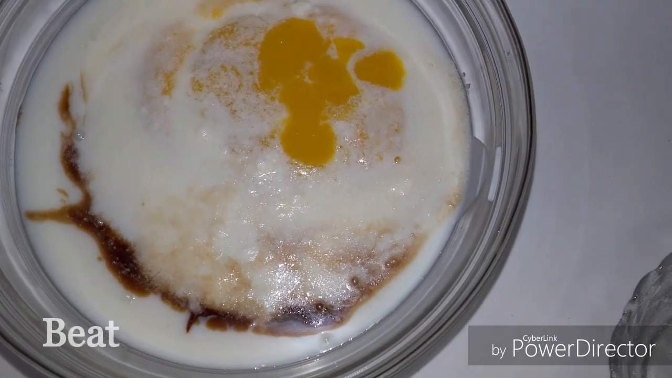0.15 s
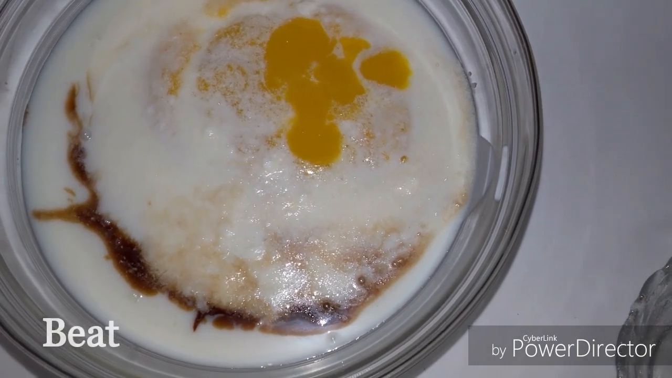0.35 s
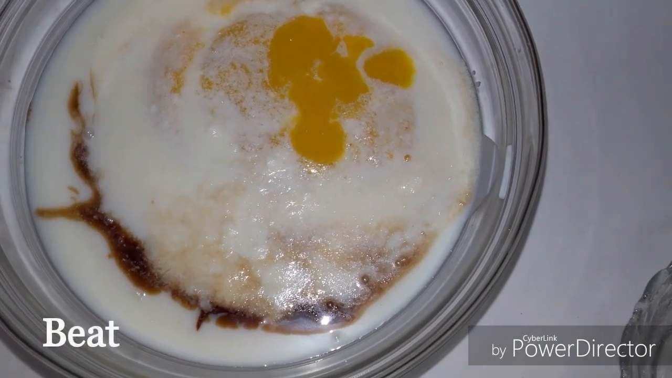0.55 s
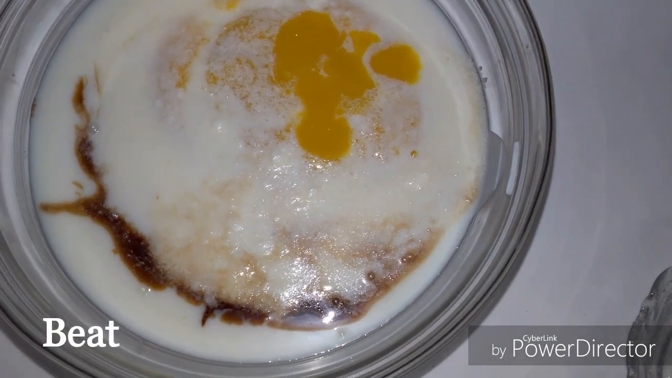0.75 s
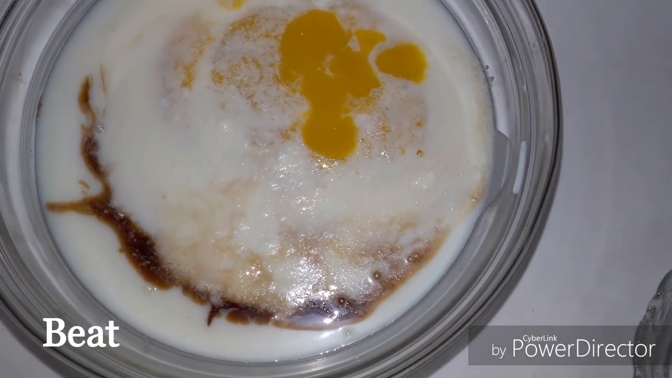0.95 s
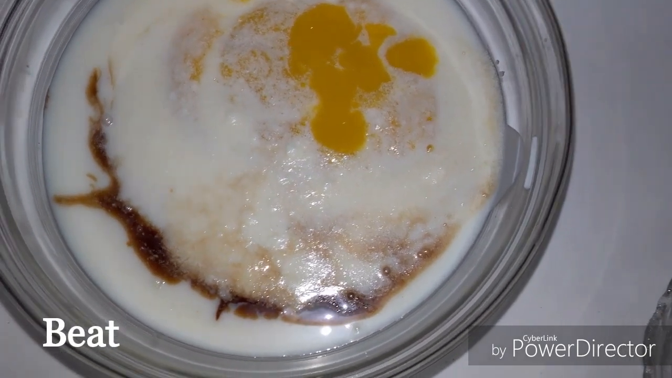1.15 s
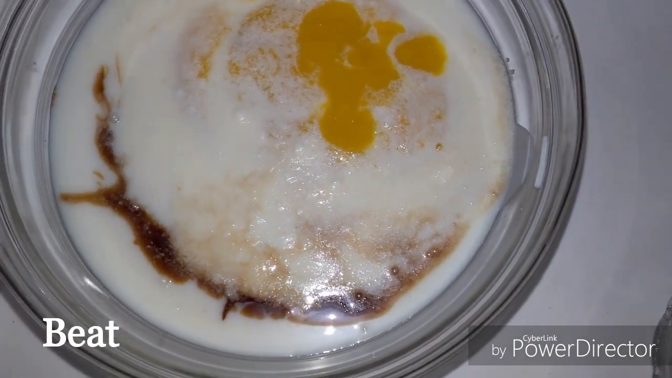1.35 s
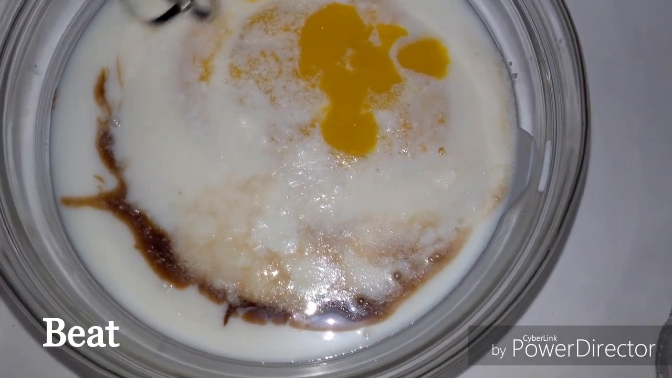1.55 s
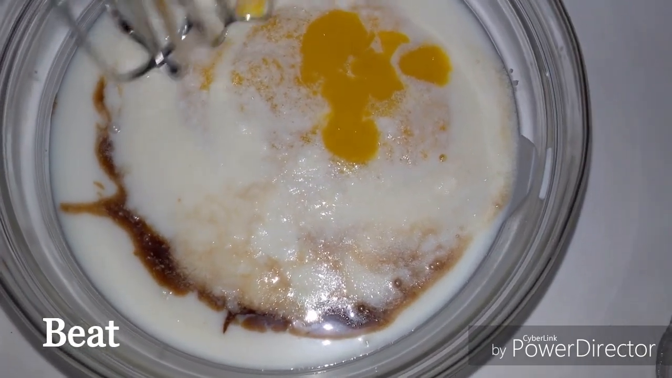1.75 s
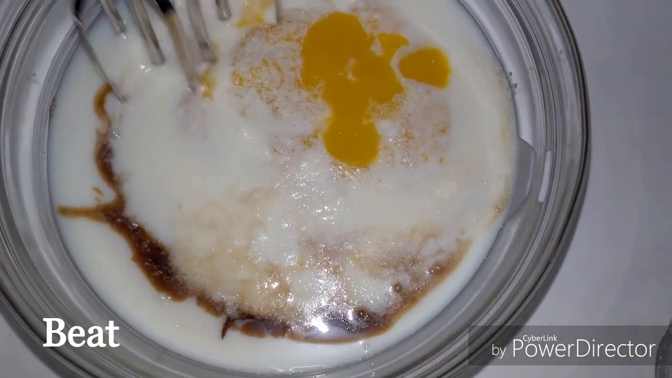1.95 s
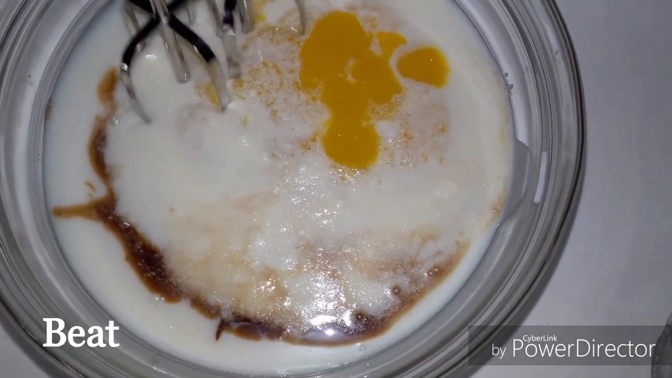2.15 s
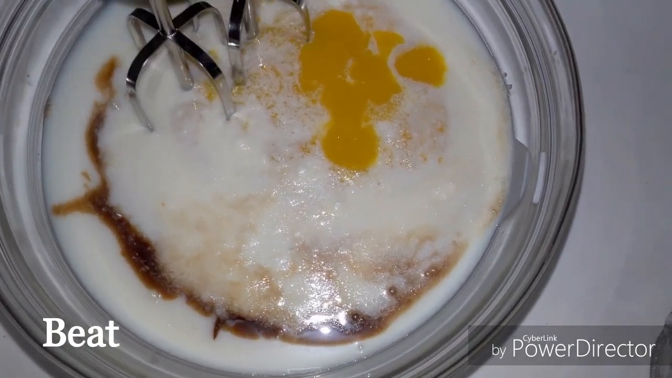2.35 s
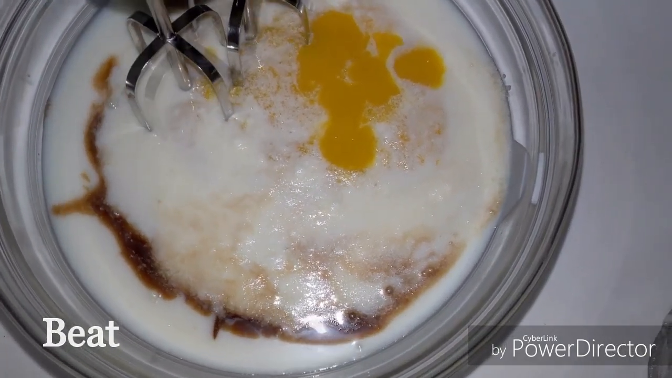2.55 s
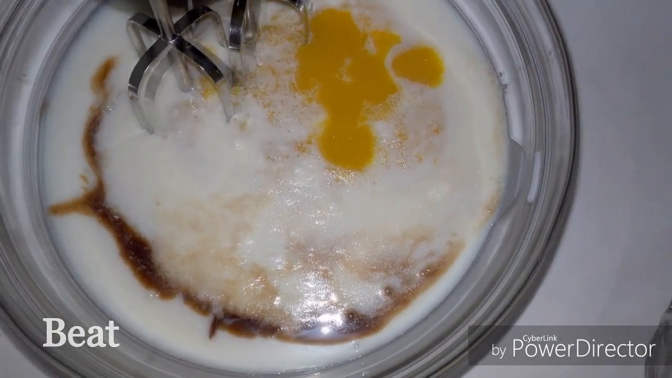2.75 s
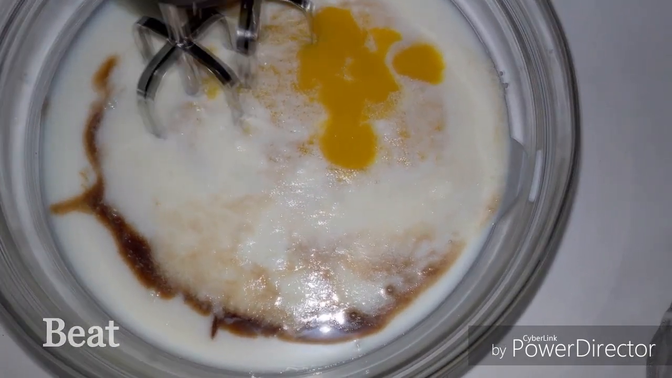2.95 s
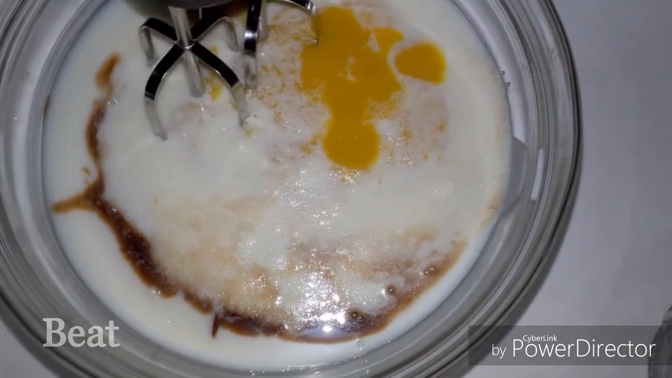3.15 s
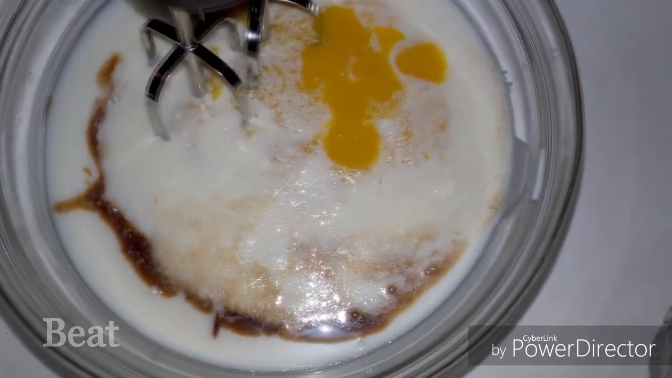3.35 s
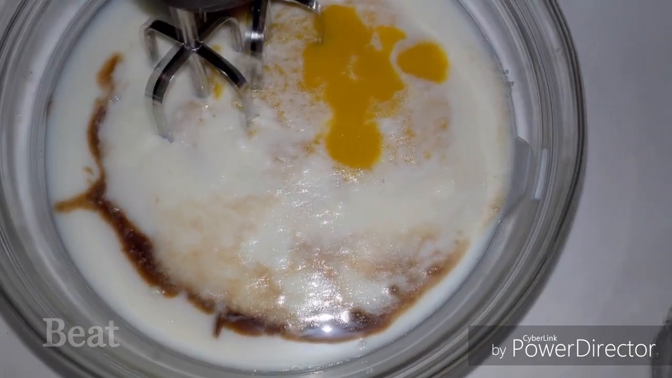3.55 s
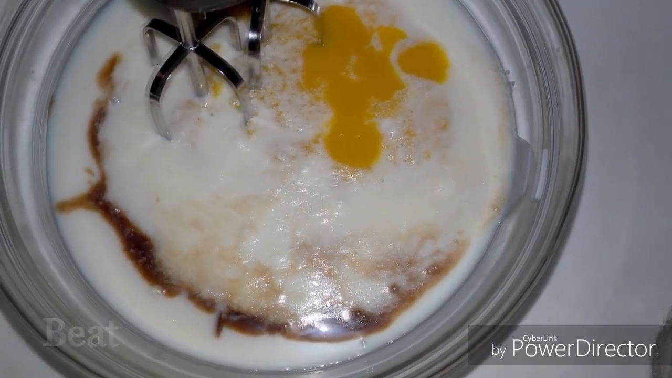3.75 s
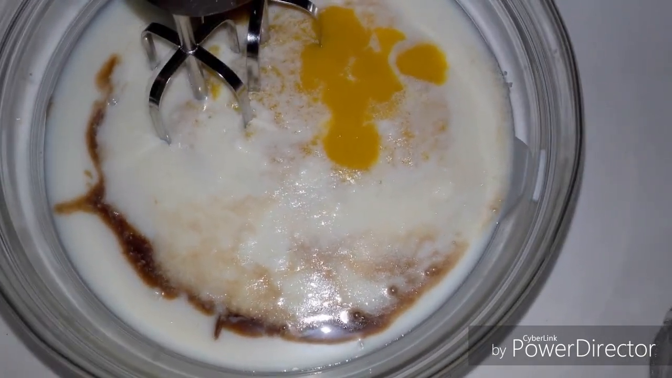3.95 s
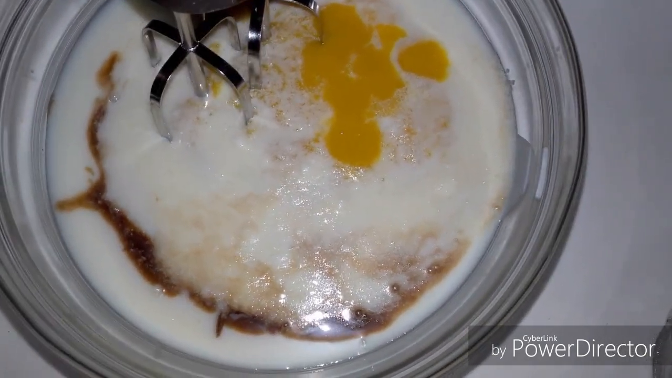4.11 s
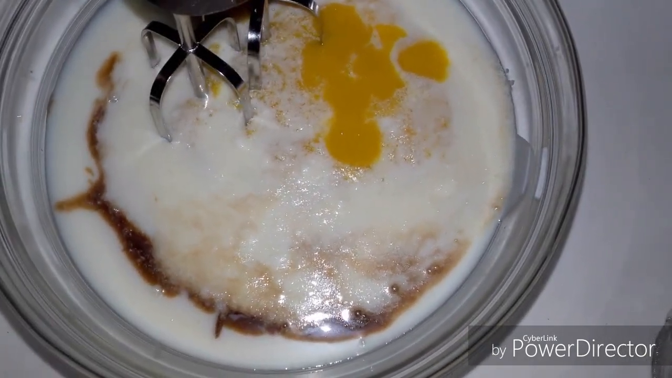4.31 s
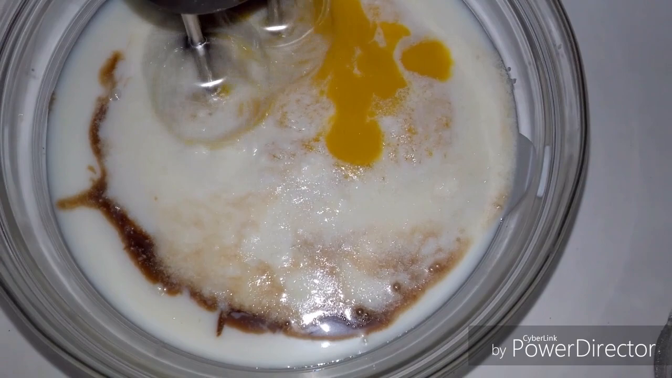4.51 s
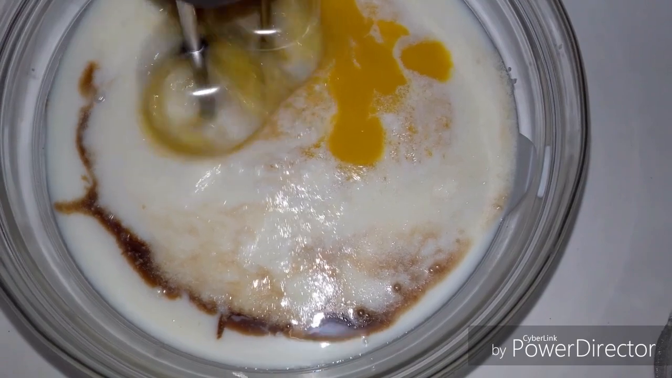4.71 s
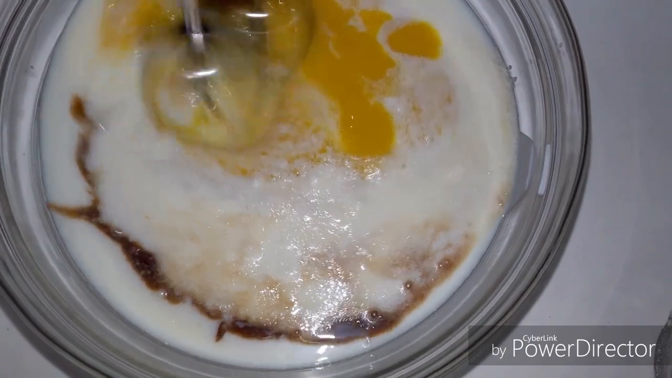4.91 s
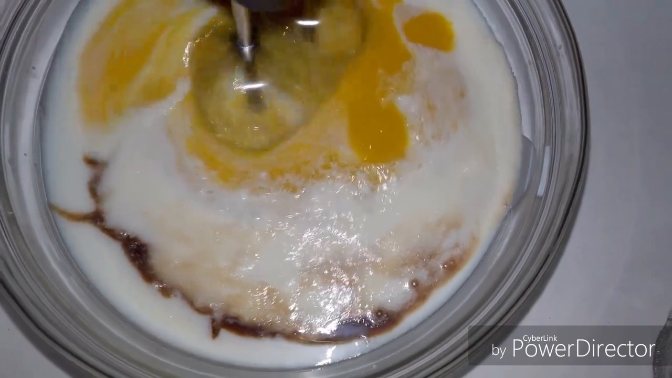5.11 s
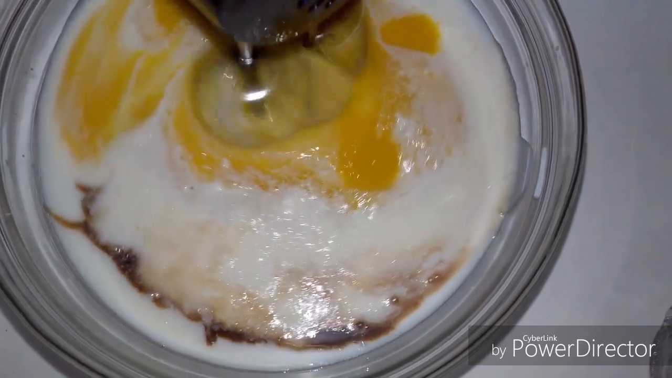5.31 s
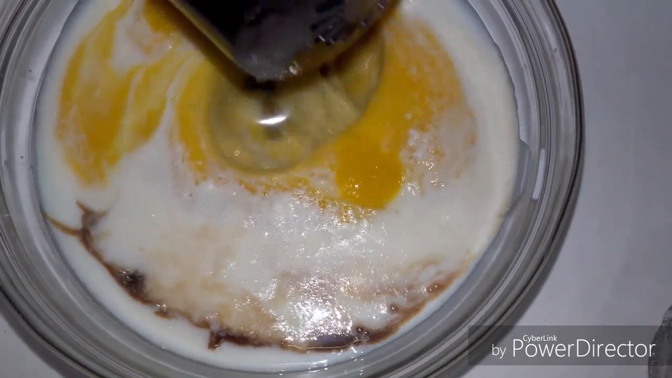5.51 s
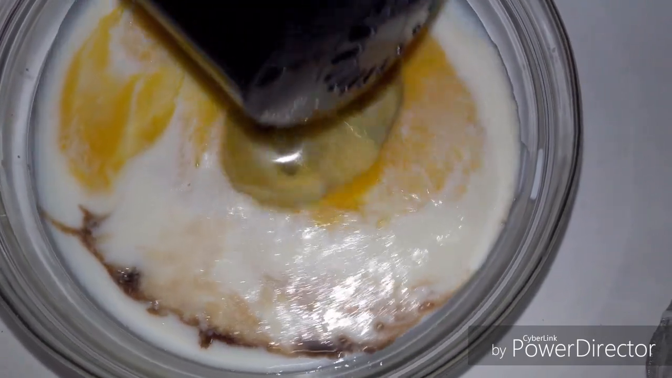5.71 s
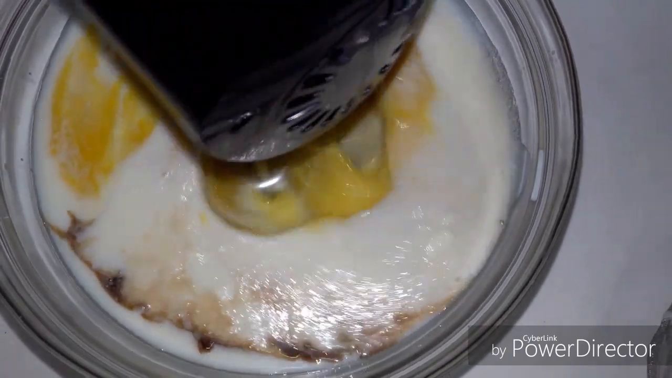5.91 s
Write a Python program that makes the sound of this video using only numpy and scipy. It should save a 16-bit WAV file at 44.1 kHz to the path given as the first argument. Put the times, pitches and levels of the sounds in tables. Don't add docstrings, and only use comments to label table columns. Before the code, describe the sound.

Loose steel beaters jingle and tap a bowl in a quiet kitchen, then a switch clicks and an electric hand mixer whines up to speed.

```python
import sys
import numpy as np
from scipy import signal
from scipy.fft import rfft, irfft
from scipy.io import wavfile
from scipy.ndimage import uniform_filter1d

SR = 44100
rng = np.random.default_rng(int(sys.argv[2]) if len(sys.argv) > 2 else 0)


def invert_db(level):
    return 10 ** (np.asarray(level, dtype=float) / 20)


def dump_mix(stems):
    frames = np.atleast_2d(stems).T
    limited = np.clip(frames, -1, 1)
    pcm = np.round(limited * 32767).astype(np.int16)
    wavfile.write(sys.argv[1], SR, pcm)


N = 267687

# pitch_hz, level_db [dB per Hz]
HUSH = [(18, -51), (30, -20), (32, -30), (64, -25.5), (197, -0.5), (270, -0.5), (379, -9.5), (576, -4),
        (692, -7), (809, -3), (1080, -11), (1260, -11.5), (2360, -13.5), (5320, -30), (15500, -27)]
# pitch_hz, width_hz, level_db
HUSH_TONES = [(209, 27, 0.5), (277, 21.7, -4), (589.7, 48, 3.5), (778, 35.9, 2), (1230, 75, 6.5)]
# middle_s, level_db, span_s [time to swell or fade by 20 dB]
RUSTLE = [
    (.03, -54, 0.02),
    (.17, -64, 0.4),
    (.32, -66.5, 0.2),
    (.45, -56, 0.16),
    (.61, -65, 0.2),
    (1.02, -64.5, 0.17),
    (1.3, -64, 0.2),
    (1.59, -61.5, 0.22),
]
# start_s, level_db, pitch_hz, t60_s
TAPS = [(0.1612, -51, 7140, 0.034), (0.1954, -51, 7000, .018), (.3451, -48, 4100, 0.11),
        (.7692, -47, 3140, 0.028), (.9093, -48, 6500, 0.0314), (.9258, -42.5, 2225, .062),
        (0.9337, -43, 3960, 0.046), (.9424, -39, 11470, 0.053), (1.0894, -72.5, 6500, 0.042),
        (1.1949, -54, 4500, 0.05), (1.28, -54.5, 7000, 0.17), (1.506, -29, 6960, .012),
        (2.1782, -47, 11400, 0.015), (2.2369, -58, 7200, .015), (2.2894, -57, 7000, .03),
        (2.3047, -37.5, 5200, .06), (2.577, -43, 3050, 0.04), (2.5864, -32, 3170, 0.03),
        (2.8714, -46, 7000, .045), (3.5812, -61.5, 3410, 0.076), (4.0726, -65.5, 3100, .031),
        (4.4406, -70, 6200, .04), (4.5374, -55, 3310, 0.034), (4.5437, -37, 6700, 0.039),
        (4.5507, -31, 3000, 0.032), (4.8611, -39, 11500, .017)]
# pitch_hz, width_hz, lift_db
BOWL = [(1290, 450, 5.5), (2120, 370, 7), (3220, 1200, 11), (5500, 255, 5), (6500, 800, 6.5),
        (7400, 1400, 2), (10740, 500, 3)]
# pitch_hz, level_db
RIM = [(1685, -40.5), (2216, -31.5), (3910, -40), (4260, -45), (1930, -54), (2900, -46), (5200, -53),
       (6700, -59), (8110, -50.5)]
# pitch_hz, level_db
BOWL_FLOOR = [(689, -46), (1580, -55), (3390, -44.5), (5050, -48.5), (5350, -51), (6730, -47), (7750, -45),
              (10600, -56)]
# pitch_hz, level_db
BOWL_WALL = [(619, -37), (1270, -46.5), (1780, -44), (3110, -45), (3450, -35.5)]
# pitch_hz, level_db
BOWL_SIDE = [(1310, -49), (1750, -51), (3370, -52), (4100, -59)]
# [modes of pitch_hz, level_db]
BLOWS = [
    (0.4233, .13, [(2280, -51.5)]),
    (.7681, .035, [(3200, -56)]),
    (0.9258, 0.047, RIM),
    (2.3047, 0.067, BOWL_FLOOR),
    (2.5867, 0.03, BOWL_WALL),
    (2.8713, .065, BOWL_SIDE),
    (4.943, 0.047, [(1230, -34)]),
    (6.015, .055, [(1080, -33)]),
]
# pitch_hz, level_db, t60_s
WIRES = [
    [(5680, -2, 0.13), (12550, 3, 0.066)],
    [(6330, 2, 0.082), (7700, -10, 0.055), (8703, -6.5, 0.086), (4220, -9, 0.1), (10360, -5, 0.09),
     (9650, -10, .05)],
    [(10920, -0.5, .1), (12100, 1.5, 0.073)],
    [(11270, -4.5, 0.17), (14260, -2, .06)],
]
# start_s, then level_db of wires 0, 1, 2, 3
JINGLES = [(0.018, -72, -68, -57, -64), (0.0998, -56, -71, -58, -83.5), (.1775, -58, -68, -60, -75),
           (.2533, -70, -63, -85, -59.5), (.3127, -63, -57, -51.5, -70), (0.373, -53.5, -62, -53, -59.5),
           (.394, -62, -70, -55, -70.5), (.4234, -55, -49, -46, -56), (.472, -57, -52, -49.5, -68.5),
           (.6594, -75.5, -66, -76, -75), (.6945, -50, -49, -62, -42.5), (.772, -57, -55, -53.5, -71.5),
           (.8809, -72, -74, -59.5, -75), (1.556, -61, -52.5, -53, -46.5)]
SCRATCH_DB = [-5, -6, -8, 5]
# pitch_hz, level_db, t60_s
STEM = [(6630, -10, 0.13), (12680, -0.5, 0.13), (13750, -10, 0.04), (7400, -24, 0.118), (12200, -8.5, .07)]
# start_s, level_db, scratch_db, low_mode_db [lift of the lowest mode]
CLINKS = [
    (.396, -34, 3.5, -7.5),
    (0.4231, -27.5, 12.5, 1),
    (0.4726, -36, 19, -3),
    (0.4912, -40.5, 14, 10.5),
]
# start_s, speed_hz [shaft turns a second]
SPEED = [
    (4.565, 54),
    (4.601, 106),
    (4.657, 157),
    (4.72, 190.5),
    (4.775, 208.5),
    (4.87, 231.5),
    (4.941, 248.3),
    (5.097, 266.6),
    (6.07, 283.8),
]
# level_db [at full speed], rise_db [per octave of speed]
TONES = [
    (-40, 13.5),
    (-50, 8),
    (-45, 3.5),
]
# throb_multiple, level_db
THROB = [(-2, -32), (-1, 0), (0, 1.5), (1, -6.5), (2, -39)]
# level_db [at full speed], rise_db [per octave of speed], start_db [from the start]
RUNNING = [
    (-33, 10.5, -45.5),
    (-36.5, 17, -65),
    (-27.5, 20, -63),
]
# pitch_hz, level_db [dB per Hz]
CASING = [(24, -84), (40, -50), (280, -21.5), (473, -22), (654, -0.5), (927, -13.5), (1220, -4.5),
          (1530, -11.5), (1690, -4), (2710, -8.5), (3070, 2.5), (4350, -11.5), (6650, -2.5), (9200, -15),
          (15500, -25.5)]
# pitch_hz, width_hz, lift_db
CASING_MODES = [(628, 150, 1.5), (809, 80, 6.5), (1290, 120, 5), (1670, 230, 2), (2494, 290, 7),
                (3090, 145, 2), (3760, 170, 6), (4160, 150, 0), (6700, 510, 6)]
# pitch_hz, width_hz, lift_db
STATOR = [(1140, 350, 9), (2842, 355, 14.5)]
# pitch_hz, width_hz, lift_db
DUCT = [(1930, 73, 7), (2100, 150, 11), (2801, 29.4, -6.5), (2800, 500, 9), (3750, 500, 14),
        (4400, 600, -8), (5200, 240, 6), (5560, 155, 4)]
# pitch_hz, width_hz, lift_db
SHELL = [(1450, 600, 11), (1780, 120, -5), (2100, 250, 5), (2600, 350, 10), (2980, 200, 6), (3265, 190, 3),
         (3370, 80, -4)]

CHANGE_S, SWITCH_S = 3.243, 4.56
BLADES, SLOTS = 10, 12
FULL_SPEED_HZ = 284.5
THROB_HZ, THROB_TOP_S = 100, 4.8728


def evened(x):
    return x / np.sqrt(np.mean(x ** 2) + 1e-20)


def drift(count, size):
    return evened(uniform_filter1d(rng.standard_normal(count), size=size))


def read(points, hz):
    f, value = np.transpose(points)
    return np.interp(np.log(hz + 1), np.log(f + 1), value)


def add(mix, s, sound):
    part = mix[round(s * SR):][:len(sound)]
    part += sound[:len(part)]


def band(x, low_hz, high_hz):
    edges_hz = [low_hz, min(high_hz, 0.45 * SR)]
    return signal.sosfilt(signal.butter(2, edges_hz, "bandpass", fs=SR, output="sos"), x)


def humps(modes, hz):
    return sum(db / (1 + (2 * (hz - f) / width) ** 2) for f, width, db in modes)


def coloured(x, modes):
    lift_db = humps(modes, np.fft.rfftfreq(len(x), 1 / SR))
    return irfft(rfft(x) * invert_db(lift_db), len(x))


def noise(colour_db, patchy_db, flicker_db, count):
    frames, hz = count // 256 + 5, np.fft.rfftfreq(1024, 1 / SR)
    real, imaginary, patches = rng.standard_normal((frames, 513, 3)).T
    patches = uniform_filter1d(patches, size=12, axis=0)
    patches = evened(uniform_filter1d(patches, size=8, axis=1))
    level_db = colour_db(hz)[:, None] + patchy_db * patches + flicker_db * drift(frames, 4)
    spectra = (real + 1j * imaginary) * invert_db(level_db)
    return evened(signal.istft(spectra, nperseg=1024, noverlap=768)[1][:count])


def ring(hz, db, t60):
    t = np.arange(SR // 5) / SR
    turn, other, split = rng.random(3)
    pair = np.sin(2 * np.pi * (hz * t + turn))
    pair += 0.5 * np.sin(2 * np.pi * ((hz + 30 + 110 * split) * t + other))
    flutter_db = 3.3 * drift(len(t), 200)
    onset = np.minimum(t / 0.0009, 1)
    return 1.59 * invert_db(db - 60 * t / t60 + flutter_db) * pair * onset


def hush():
    t = np.arange(N) / SR
    carried = 0.5 * (1 - np.tanh((t - 1.16) / 0.2))
    level_db = -51 + 3 * carried - 15.5 * (t > CHANGE_S)
    level_db += 8 * (1 - np.exp(-np.maximum(t - SWITCH_S, 0) / 0.17))
    waver = drift(N, 5000)
    hum = invert_db(-11.5 + 2.1 * waver) * np.sin(2 * np.pi * np.cumsum(273 + 3 * waver) / SR)
    air = noise(lambda hz: read(HUSH, hz) + humps(HUSH_TONES, hz), 0.97, 0.92, count=N)
    return invert_db(level_db) * (hum + air)


def kitchen(x):
    t = np.arange(SR // 2) / SR
    echoes = np.zeros(len(t))
    at = np.arange(200, SR // 2 - 20, 20)
    echoes[at + rng.integers(0, 20, len(at))] = rng.choice([-1., 1.], len(at))
    tail = band(echoes, 207, 3200) * invert_db(-60 * t / 0.291)
    tail += band(tail * 0 + echoes, 2920, 16000) * invert_db(-60 * t / 0.163)
    return signal.fftconvolve(x, tail / np.linalg.norm(tail))[:N]


def rustle():
    t = np.arange(N) / SR
    level = sum(invert_db(db - 20 * abs(t - s) / span) for s, db, span in RUSTLE)
    grip = [(3480, 1200, 6.0), (7000, 2200, 10)]  # Hz, width Hz, dB
    return level * noise(lambda hz: humps(grip, hz) - 14 * abs(np.log2((hz + 1) / 5000)), 2.5, 3.5, count=N)


def taps():
    out, t = np.zeros(N), np.arange(SR // 8) / SR
    for s, db, hz, t60 in TAPS:
        near, wide, low = rng.standard_normal((3, len(t)))
        share = np.clip(0.51 - 0.14 * np.log2(t60 / 0.036), 0, 1)
        bowl = evened(coloured(band(wide, 1200, 10400), BOWL))
        contact = share * evened(band(near, hz * 0.884, hz * 1.049)) + (1 - share) * bowl
        thud_db = -3.5 - 4.5 * np.log2(hz / 3000)
        thud_db += 5.5 * (CHANGE_S < s < SWITCH_S - 0.1)
        thud = invert_db(thud_db) * evened(band(low, 540, 1520)) * np.minimum(t / 0.00336, 1)
        blow = (contact + thud) * invert_db(-60 * t / t60)
        crack = share * invert_db(2 - 60 * t / 0.005) * evened(band(wide, hz * 0.75, hz * 1.3))
        rattle = (0.34 * contact + 0.6 * bowl + thud) * invert_db(-15.5 - 60 * t / (3.8 * t60))
        add(out, s, invert_db(db + 2.5) * (blow + crack + rattle))
    return out


def knocks():
    out = np.zeros(N)
    for s, t60, modes in BLOWS:
        add(out, s, sum(ring(hz, db, t60 * (3000 / hz) ** 0.21) for hz, db in modes))
    return band(out, 350, 15100)


def scratch(db):
    t = np.arange(SR // 20) / SR
    return invert_db(db - 60 * t / 0.0475) * evened(band(rng.standard_normal(len(t)), 4600, 15000))


def beaters():
    out = np.zeros(N)
    for s, *wire_db in JINGLES:
        add(out, s, scratch(np.max(np.add(wire_db, SCRATCH_DB))))
        for wire, up in zip(WIRES, wire_db):
            add(out, s, sum(ring(hz, db + up, t60) for hz, db, t60 in wire))
    ends_s = [s for s, *_ in CLINKS[1:]] + [N / SR]
    for (s, db, scratch_db, low_db), until in zip(CLINKS, ends_s):
        add(out, s, scratch(db + scratch_db - 26.5))
        stem = sum(ring(hz, db + up + low_db * (k == 0), t60) for k, (hz, up, t60) in enumerate(STEM))
        left_s = until - s - np.arange(len(stem)) / SR
        add(out, s, stem * np.clip(left_s / 0.004, 0.15, 1))
    return out


def motor_tones(turn, octaves, speed, throb, wobble):
    count = len(turn)
    swept = [(DUCT, 2 * BLADES), (DUCT, BLADES), (SHELL, SLOTS)]
    double_db, blade_db, slot_db = (db + rise_db * octaves + humps(body, order * speed)
                                    for (db, rise_db), (body, order) in zip(TONES, swept))
    blades = invert_db(double_db + 3) * np.cos(2 * BLADES * turn) + invert_db(blade_db + 3) * np.cos(BLADES * turn)
    blades *= invert_db(2.3 * drift(count, 600))
    slot = evened(sum(invert_db(db) * np.cos(SLOTS * turn + round(k) * throb) for k, db in THROB))
    slot += invert_db(-21) * (1 + np.cos(throb)) * np.cos(2 * SLOTS * turn)
    slot *= invert_db(2.4 * drift(count, 350))
    shaft = invert_db(-57 + 30 * octaves + 3 * wobble) * np.cos(turn)
    return shaft + blades + coloured(invert_db(slot_db) * slot, STATOR)


def running_noise(turn, octaves, throb, near_db):
    count = len(turn)
    levels = [invert_db(near_db) * (invert_db(db + rise_db * octaves) + invert_db(start_db)) for db, rise_db, start_db in RUNNING]
    out = levels[-1] * invert_db(-20) * drift(count, 150) * np.cos(2 * SLOTS * turn)
    edges_hz = [(1, 2100), (2100, 4600), (4600, 20000)]
    for level, (low, high), lift_db in zip(levels, edges_hz, (0.2, 5.5, 0.8)):
        def colour_db(hz):
            skirt_db = -10 * np.log10((1 + (low / (hz + 1)) ** 8) * (1 + (hz / high) ** 8))
            return read(CASING, hz) + humps(CASING_MODES, hz) + skirt_db
        layer = noise(colour_db, 0.78, 0.65, count=count)
        out += level * invert_db(lift_db) * layer * (1 + 0.0246 * np.cos(throb))
    return out


def motor():
    t = np.arange(round(SWITCH_S * SR), N) / SR
    s, turns = np.transpose(SPEED)
    speed = FULL_SPEED_HZ - np.exp(np.interp(t, s, np.log(FULL_SPEED_HZ - turns)))
    octaves = np.log2(speed / FULL_SPEED_HZ)
    near_db = 0.26 * (t - t.mean())
    wobble = drift(len(t), 600)
    turn = 2 * np.pi * np.cumsum(speed * (1 + 0.00087 * wobble * (speed[-1] / speed) ** 2)) / SR
    throb = 2 * np.pi * THROB_HZ * (t - THROB_TOP_S)
    out = motor_tones(turn, octaves, speed, throb, wobble) + running_noise(turn, octaves, throb, near_db)
    return np.pad(out * np.minimum((t - t[0]) / 0.017, 1), (N - len(t), 0))


def scene():
    hits = beaters() + taps() + knocks()
    mono = hush() + rustle() + hits + invert_db(-14) * kitchen(hits) + motor()
    return np.array([mono, mono])


def roll_off(x):
    return signal.sosfilt(signal.butter(12, 15680, fs=SR, output="sos"), x)


def record(dry):
    offset = np.where(np.arange(N) / SR < CHANGE_S, -0.001, -0.000185)
    limited = signal.oaconvolve(dry, signal.firwin(501, 15600, fs=SR)[None], "same")
    return roll_off(limited + offset)


dry = scene()
out = record(dry)
dump_mix(out)
```